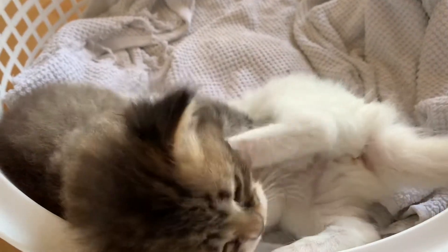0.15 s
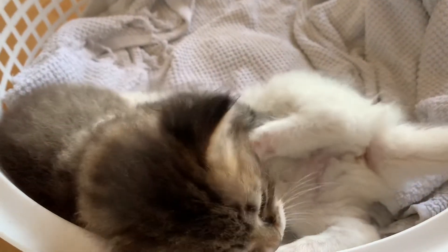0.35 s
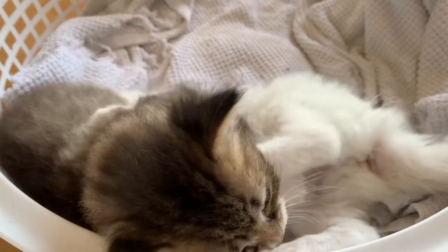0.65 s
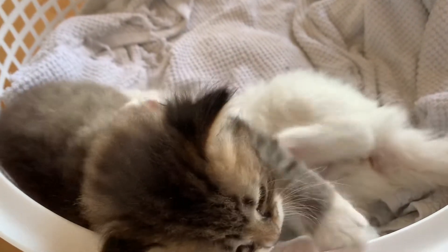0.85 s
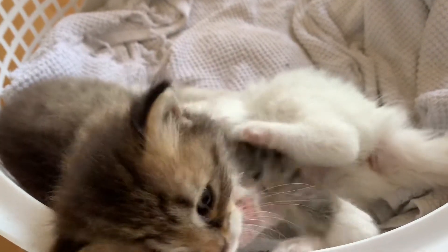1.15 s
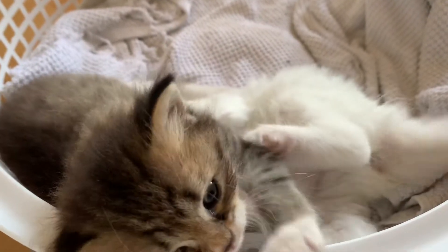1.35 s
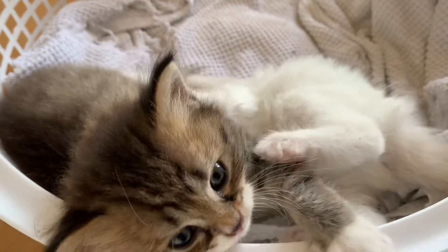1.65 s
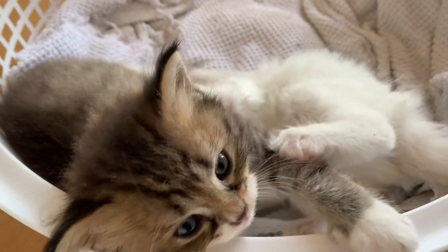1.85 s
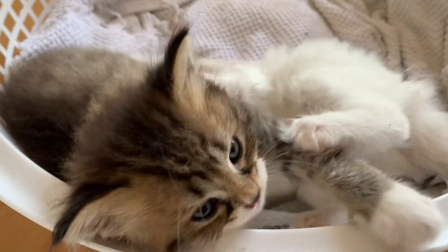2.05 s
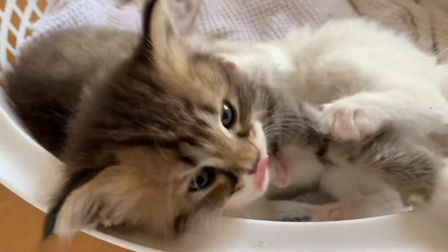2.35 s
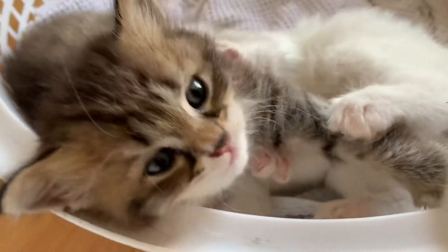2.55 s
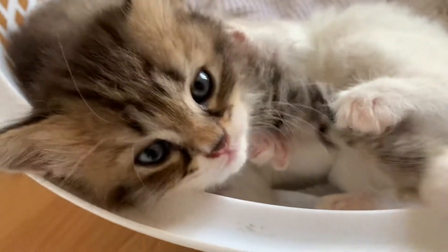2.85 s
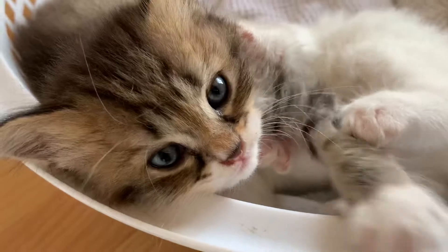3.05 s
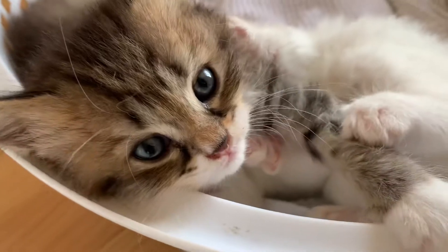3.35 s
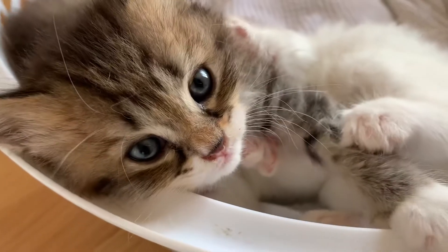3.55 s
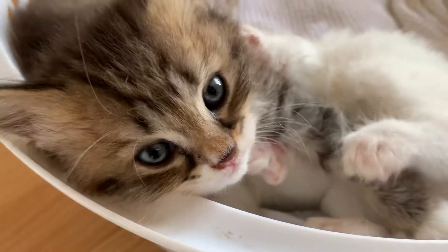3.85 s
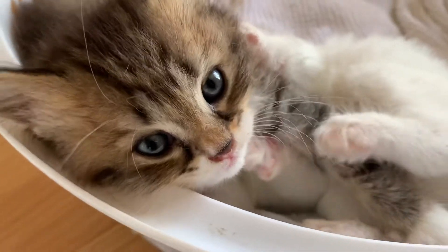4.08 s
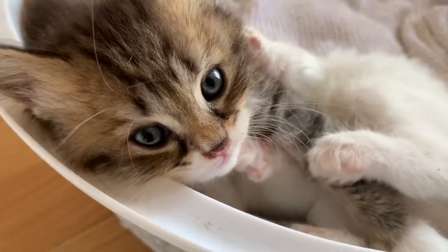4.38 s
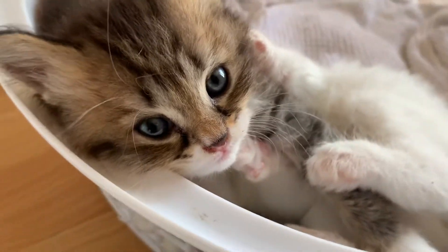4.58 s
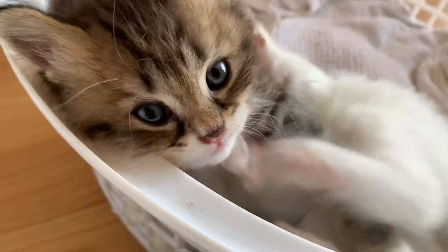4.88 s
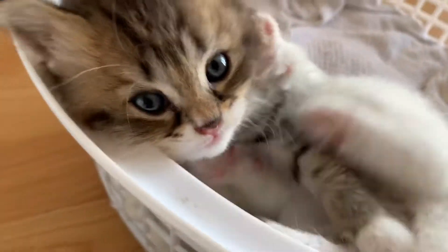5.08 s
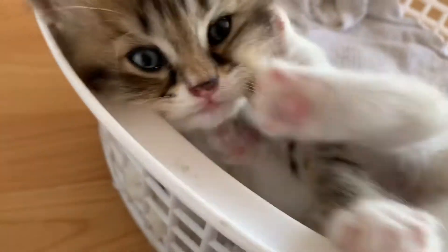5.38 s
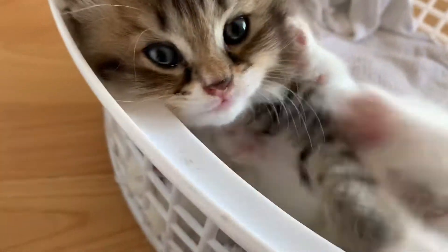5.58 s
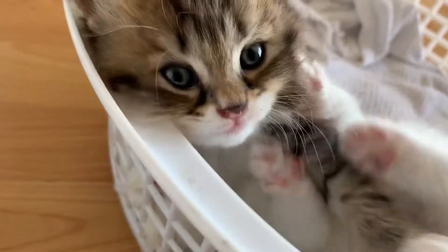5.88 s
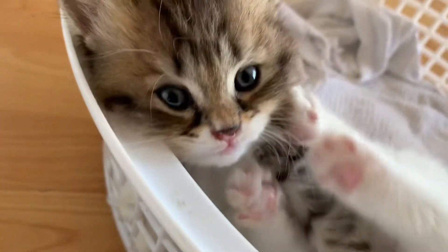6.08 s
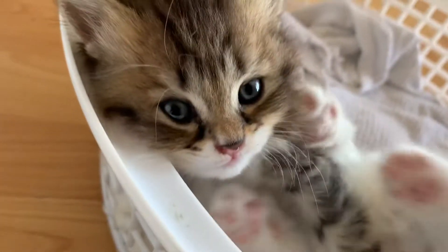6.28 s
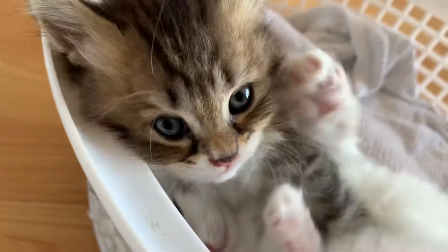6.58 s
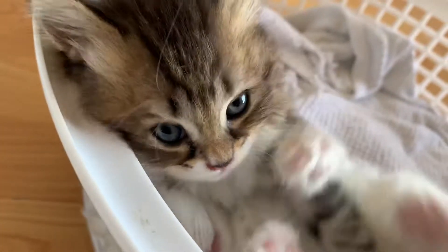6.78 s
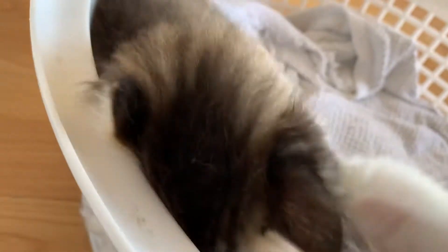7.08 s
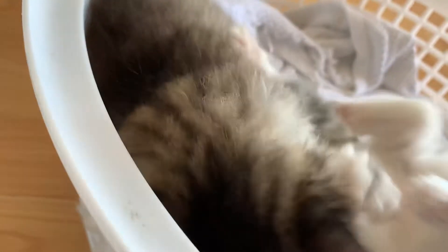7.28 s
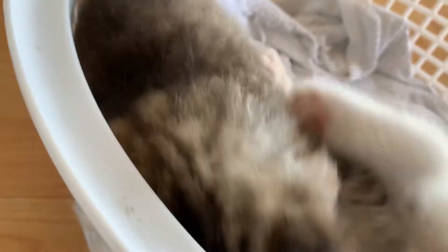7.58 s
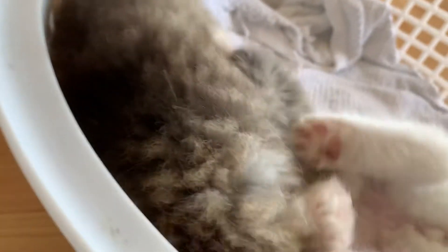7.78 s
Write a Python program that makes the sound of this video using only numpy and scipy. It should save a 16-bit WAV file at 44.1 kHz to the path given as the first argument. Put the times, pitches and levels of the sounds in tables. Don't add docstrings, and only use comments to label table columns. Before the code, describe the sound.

Close, quiet fur and cloth rustles with small claw clicks on plastic, a tiny nose wheeze, and a deep steady machine hum behind.

```python
import sys
import numpy as np
from scipy import signal
from scipy.fft import rfft, irfft, next_fast_len
from scipy.io import wavfile
from scipy.ndimage import uniform_filter1d

SR = 44100
rng = np.random.default_rng(int(sys.argv[2]) if len(sys.argv) > 2 else 0)


def linear_from_db(decibels):
    return 10 ** (np.asarray(decibels, float) / 20)


def bounce(signal):
    frames = np.transpose(np.atleast_2d(signal))
    limited = np.clip(frames, -1, 1)
    pcm = np.round(limited * 32767).astype(np.int16)
    wavfile.write(sys.argv[1], SR, pcm)


N = 349624
TIME = np.arange(N) / SR
FFT_HALF = next_fast_len(N // 2)
HZ = np.maximum(np.arange(FFT_HALF + 1) * SR / 2 / FFT_HALF, 1)


def over_hz(table):
    hz, value = np.transpose(table)
    return np.interp(np.log(HZ), np.log(hz), value)


def colour(x, gain):
    return irfft(rfft(x, 2 * FFT_HALF) * gain)[..., :N]


def resonance(hz, width_hz):
    return 1j * HZ * width_hz / (hz ** 2 - HZ ** 2 + 1j * HZ * width_hz)


def level(x, db):
    return x * linear_from_db(db) / np.sqrt(np.mean(x ** 2))


def walk(rate):
    hold = int(SR / rate)
    steps = np.repeat(rng.standard_normal(N // hold + 1), hold)
    return level(uniform_filter1d(uniform_filter1d(steps, hold), hold)[:N], 0)


def pair(alike):
    mid, side = rng.standard_normal((2, N))
    mid = colour(mid, np.sqrt(1 + alike))
    side = colour(side, np.sqrt(1 - alike))
    return np.array([mid + side, mid - side]) / np.sqrt(2)


def patches(x, depth_db):
    _, _, z = signal.stft(x, nperseg=256)
    field = uniform_filter1d(rng.standard_normal(z.shape[1:]), size=2, axis=0)
    field = uniform_filter1d(field, size=9, axis=1)
    return signal.istft(z * linear_from_db(depth_db * field / field.std()), nperseg=256)[1][:, :N]


# f/Hz, level/dB per Hz
DRAG = [(700, -33), (1150, -7), (1500, -9), (2300, -12.5), (2800, -11.5), (3400, -27)]
# f/Hz, level/dB per Hz
CLOTH = [(2200, -17), (2800, -4), (3600, -3), (4400, -6.5), (5400, -2), (6300, -7.5), (7500, -25.5)]
# f/Hz, level/dB per Hz
HAIR = [(5500, -26), (6600, -5.5), (7400, -1.5), (8500, -2.5), (10200, -5.3), (11500, -0.5), (12300, -31)]
# f/Hz, level/dB per Hz
SHEEN = [(11500, -30.5), (12300, 5), (13500, -0.4), (14500, -5), (16300, -11.5)]
# f/Hz, width/Hz, level/dB
BASKET_RIBS = [(1850, 450, -2.5), (2400, 360, -1), (3500, 1100, -8), (4230, 350, 6), (6180, 310, 3),
               (8150, 340, 7.5), (9960, 900, -4.5)]


def rubbing(per_s=2500, smooth_db=2.5, patchy_db=1, folds_db=2.9):
    ribs = 1 + sum(linear_from_db(db) * resonance(hz, width) for hz, width, db in BASKET_RIBS)
    likeness = (0.3, 0.25, 0.69, 0.97)
    out = 0
    for spectrum, gain, alike in zip((DRAG, CLOTH, HAIR, SHEEN), strokes(), likeness):
        when = rng.random(N)
        size = np.minimum(rng.exponential(size=N), 4)
        slips = (when < per_s / SR) * linear_from_db(3 * size)
        slips = np.convolve(slips, np.exp(-np.arange(120) / 25))[:N]
        noise = pair(alike)
        grain = level(slips * noise, 0) + linear_from_db(smooth_db) * noise[:, ::-1]
        layer = level(colour(grain, ribs * linear_from_db(over_hz(spectrum))), 0)
        out = out + layer * gain * linear_from_db(patchy_db * walk(30))
    return patches(out, folds_db)


# t/s, level/dB, fade/dB per s, weave drag/dB, fine hair/dB
JOLTS = [(.012, -74, 251, -7, -2.5), (.712, -63.5, 276, 1.5, -0.5), (.812, -59, 113, -5, 0),
         (1.118, -70, 350, -1.5, 2), (1.447, -66, 199, 0.5, -4.5), (1.825, -80.5, 100, 4.5, -10.5),
         (2.095, -60, 54.5, 2, -12), (2.203, -50, 55.5, -5.5, -5.5), (2.488, -59, 130, -9, -18.5),
         (2.622, -65, 100, -8, -9), (2.865, -61, 90, -4.5, -12.5), (3.096, -70, 253, 1, 4.5),
         (3.54, -63, 93.5, -4, 1), (4.815, -67.5, 100, -3.5, 2), (4.858, -58.5, 349, -4.5, -4.5),
         (4.89, -67.5, 136, 0, -5.5), (3.79, -71, 112, -2, -1), (5.205, -75.5, 92.5, 4, -2.5),
         (5.465, -67, 150, -4.5, -12), (6.284, -64, 87, 5.5, -5.5), (6.572, -82.5, 62, -12, -3)]
# peak t/s, level/dB, time to fall 10 dB/s, weave drag/dB, fine hair/dB
STROKES = [(1.37, -79.5, 0.12, 4, -6.5), (1.539, -74.5, 0.14, -0.5, -6), (1.94, -78.5, 0.13, 5.5, -10.5),
           (2.05, -72.5, 0.13, -6, -6.5), (2.25, -49, 0.0678, -9, -2.5), (3.44, -82.5, 0.17, -2.5, -6),
           (2.73, -65.5, 0.11, 0, -6), (3.19, -73, -0.12, 0, 2.5), (3.765, -57.5, 0.0217, -3, 4),
           (3.715, -59.5, 0.0144, -1.5, 3), (2.36, -60, 0.07, -6, -5), (6.4, -74, 0.12, 2.5, -4.5),
           (4.38, -83, 0.25, -13, 1), (4.75, -88, 1.2, -13, -5.5), (5.32, -84, 0.3, -1, 3),
           (5.56, -66, 0.07, -1, 1), (5.95, -85, 0.5, 4.5, 3), (6.17, -76.5, 0.17, -1.5, 1.5),
           (6.733, -73, 0.15, -2, -5), (6.92, -71.5, 0.07, -7, 3), (7.12, -83, 0.63, 4.5, 1.5)]
# level/dB, weave drag/dB, fine hair/dB
STIR = (-94, 0, 1.7)


def strokes(jolt_db_per_s=1800, sheen_db=-7, steepen=2.0):
    step = 16
    t = TIME[::step]
    shapes = [STIR]
    for s, db, fade, *mix in JOLTS:
        fall_db = np.where(t < s, jolt_db_per_s * (s - t), fade * (t - s))
        shapes.append((db - fall_db, *mix))
    for s, db, half, *mix in STROKES:
        shapes.append((db - 10 * ((t - s) / half) ** 2, *mix))
    power = 0
    for db, drag_db, hair_db in shapes:
        top_db = sheen_db + steepen * min(hair_db, 4) + 0.22 * (np.max(db) + 66.5)
        mix = linear_from_db(2 * np.array([drag_db, 0, hair_db, top_db]))
        power = power + mix[:, None] * linear_from_db(2 * db)
    return np.repeat(np.sqrt(power), step, axis=1)[:, :N]


# t/s, peak level/dB, ring f/Hz, bright crack/dB
TICKS = [(0.7266, -48, 2680, 0), (0.807, -51, 2430, -9.5), (0.8125, -41, 2350, -13.5),
         (1.1123, -57.5, 2080, -18), (1.1628, -54, 1770, -17), (2.1783, -47.5, 2500, -8.5),
         (2.1988, -30, 4420, -16.5), (2.2314, -43, 3780, -10), (2.4851, -49.5, 2450, -13),
         (2.6183, -50.5, 2400, -10), (2.8583, -47, 4460, -4), (3.0898, -46, 3860, -3),
         (3.5343, -47.5, 4170, 8.5), (4.8408, -35, 4800, 13.5), (4.8474, -35.5, 4140, -4),
         (4.8554, -49, 2623, 0), (4.8672, -33.5, 3980, -2), (4.8813, -37, 2470, -9.5),
         (5.4803, -48, 2150, -13.5), (6.681, -66, 3330, -6.5), (6.279, -46.5, 3300, -15),
         (.1765, -69, 2610, -10), (1.794, -66.5, 6400, -13), (1.887, -64.5, 7000, -6),
         (2.3654, -48, 5700, -3.5), (3.695, -54, 4000, -10), (3.708, -54.5, 3500, -5),
         (4.8415, -37.5, 6200, -8), (5.459, -58, 2580, -4), (5.4805, -52, 3600, -13),
         (5.549, -53, 4000, -6), (5.503, -58, 8500, -2), (5.5799, -53, 4000, -6), (5.606, -57.5, 3400, -8),
         (5.545, -56, 10000, -4), (6.571, -66, 5100, -12)]
# t/s, peak level/dB, ring f/Hz, bright crack/dB, thud/dB
PAWS = [(0.7054, -38, 3770, 5.5, -12), (1.1224, -59, 1640, -1.5, 2.5), (1.3223, -57.5, 2680, -14, -3),
        (1.443, -51.5, 4330, -16.5, -5), (2.0225, -61, 4700, -6, -1), (2.0676, -59.5, 2360, -2.5, 1),
        (2.4914, -49, 4320, -18.5, 5.5), (3.4978, -60.5, 2040, -12, -8), (3.718, -46, 3960, -4.5, -5),
        (4.3459, -61.5, 1600, 4.5, 2), (5.1922, -43, 2200, -17.5, 7), (5.241, -52, 2363, -4, -3.5),
        (5.5487, -50, 1650, -2, 10), (5.975, -65, 1850, 12, -3), (6.276, -41.5, 2565, -6.5, 1.5),
        (6.29, -50, 2600, -12.5, 6)]
# t/s, peak level/dB, ring f/Hz, bright crack/dB, ring/ms
KNOCKS = [
    (1.237, -61.5, 1850, -21, 11),
    (1.2965, -54.5, 1800, -6.5, 4.7),
    (1.8212, -53, 1890, -18, 5),
    (2.0925, -44.5, 1590, -17, 25),
    (2.969, -54, 2070, -7, 2.1),
    (5.198, -28, 2280, -11.5, 0.86),
]
# t/s, peak level/dB, ring f/Hz, bright crack/dB
PINGS = [
    (1.7766, -68, 4040, -7.5),
    (1.8738, -64, 4460, -12),
    (4.6757, -67, 3670, -9),
    (4.7648, -71, 2970, -8.5),
    (4.876, -47, 10360, -5),
    (6.587, -60, 5060, -6),
]
RIB_MS, THREAD_MS, LIGHT_THUD_DB = 1.6, 2.4, -21.5


def claws(late_ms=1.3, crack=0.54, thud_ms=1.6, rise_ms=0.4, ring_db=3, spread_db=-5, crack_db=3, thud_db=-3):
    size = 1600
    t = np.arange(size) / SR * 1000
    blows = [(*b, LIGHT_THUD_DB, RIB_MS) for b in TICKS]
    blows += [(*b, RIB_MS) for b in PAWS]
    blows += [(*b[:4], LIGHT_THUD_DB, b[4]) for b in KNOCKS]
    blows += [(*b, LIGHT_THUD_DB, THREAD_MS) for b in PINGS]
    ring, scrape, snap, thud = layers = np.zeros((4, 2, N))
    chance = rng.standard_normal((len(blows), 5, size))
    for (s, db, hz, bright_db, low_db, ring_ms), (both, *own) in zip(blows, chance):
        i = int((s + late_ms / 1000) * SR)
        here = np.s_[:, i:i + size]
        gain = linear_from_db(db) * (1 - np.exp(-t / rise_ms))
        noise = np.sign(both) + 0.78 * np.array(own[:2])
        side = np.array(own[2:])[:, :1]
        contact_ms = min(ring_ms, 1.8)
        sharp_db = 0.47 * max(bright_db + 6, 0)
        tone = np.sin(2 * np.pi * hz * t / 1000 + 0.33 * side) * np.exp(-t / ring_ms)
        ring[here] += gain * linear_from_db(ring_db - sharp_db) * tone
        scrape_db = spread_db + 0.2 * sharp_db + min(bright_db + 12.5, 0)
        scrape[here] += gain * linear_from_db(scrape_db) * noise * np.exp(-t / contact_ms)
        snap[here] += gain * linear_from_db(bright_db + crack_db) * noise * np.exp(-t / (crack * contact_ms))
        thud[here] += gain * linear_from_db(low_db + thud_db) * noise * np.exp(-t / thud_ms)
    bands = 1, 2 * resonance(2000, 4500), resonance(8000, 8000) ** 2, 3 * resonance(810, 1100) ** 2
    return sum(colour(x, band) for x, band in zip(layers, bands))


# t/s, length/s, rms level/dB, start f/Hz, end f/Hz
RUBS = [(.812, .05, -67, 2360, 2280), (1.826, .06, -67, 1950, 1980), (1.9, .07, -69.5, 2000, 2600),
        (2.095, .1, -61, 1550, 1394), (2.1, .08, -63, 4500, 4560), (2.2, .09, -52, 4500, 4200),
        (2.21, .09, -57, 2610, 3100), (2.49, .07, -66, 4280, 4380), (2.62, .05, -66, 6500, 6300),
        (3.69, .03, -67.5, 2595, 2500), (4.845, .05, -56, 5720, 5600), (4.885, 0.028, -63, 2400, 2300),
        (5.47, .06, -66, 3900, 4000), (6.288, .06, -62, 2100, 2500), (6.29, .045, -61, 1100, 1320),
        (6.57, 0.088, -77.5, 5300, 5500), (3.86, 0.036, -77, 3900, 4000), (2.865, .09, -68, 4400, 4300)]
RUB_WIDTH, RUB_RISE_S = 0.17, 0.005


def rubs(alike=0.7, grain_db=3):
    out = np.zeros((2, N))
    size = 8000
    t = np.arange(size) / SR
    for (s, length, db, from_hz, to_hz), chance in zip(RUBS, rng.standard_normal((len(RUBS), 7, size))):
        part = np.clip(t / length, 0, 1)
        smear = np.hanning(int(SR / (RUB_WIDTH * from_hz)) + 2)
        smear = smear / np.sqrt(np.sum(smear ** 2))
        slow = signal.fftconvolve(chance, smear[None], mode="same", axes=1)
        a = np.sqrt(alike) * slow[0] + np.sqrt(1 - alike) * slow[1:3]
        b = np.sqrt(alike) * slow[3] + np.sqrt(1 - alike) * slow[4:6]
        phase = 2 * np.pi * np.cumsum(from_hz + (to_hz - from_hz) * part) / SR
        shape = np.minimum(t / RUB_RISE_S, 1) * np.sqrt(1 - part ** 2)
        shape = shape * linear_from_db(db + grain_db * uniform_filter1d(slow[6], size=150))
        i = int(s * SR)
        out[:, i:i + size] += shape * (a * np.cos(phase) + b * np.sin(phase))
    return out


# t/s, peak level/dB, f/Hz, decay/ms
BUMPS = [
    (4.846, -29.5, 78.7, 22),
    (4.881, -45, 473, 7),
    (5.199, -44, 501, 5.2),
    (5.199, -45.5, 1340, 2.1),
    (6.3, -60.5, 1110, 12),
]


def bumps():
    out = np.zeros(N)
    for s, db, hz, decay_ms in BUMPS:
        t = np.maximum(TIME - s, 0)
        out += linear_from_db(db) * np.sin(2 * np.pi * hz * t) * np.exp(-t * 1000 / decay_ms)
    return out


# t/s, level/dB
WHEEZE = [
    [(1.23, -88), (1.3, -71), (1.414, -70.5), (1.482, -60.5), (1.564, -62.5), (1.65, -82)],
    [(3.33, -92), (3.38, -75), (3.46, -78), (3.5, -80.5)],
    [(4.28, -81), (4.294, -83), (4.5, -87)],
]
# f/Hz, width/Hz, level/dB
NOSE = [(2620, 220, -13), (3240, 320, -3.5), (3797, 150, 1), (4270, 110, -12)]
# t/s, f/Hz, level/dB, octave level/dB
SQUEAK = [(.44, 2800, -100, -110), (.452, 3680, -82, -105), (.465, 4300, -79.5, -99), (.48, 4100, -72, -95),
          (0.498, 4180, -76, -89), (0.521, 3820, -73, -75), (.545, 3500, -80, -100),
          (.565, 3210, -88, -110), (.605, 2670, -99, -110)]


def nose(share_db=-2):
    passages = sum(linear_from_db(db) * resonance(hz, width) ** 2 for hz, width, db in NOSE)
    flow = sum(linear_from_db(np.interp(TIME, *np.transpose(b), left=-200, right=-200)) for b in WHEEZE)
    breath = flow * level(colour(pair(0.94), passages), share_db)
    s, hz, db, octave_db = np.transpose(SQUEAK)
    phase = 2 * np.pi * np.cumsum(np.interp(TIME, s, hz)) / SR
    on = (TIME > s[0]) & (TIME < s[-1])
    whistle = linear_from_db(np.interp(TIME, s, db)) * np.sin(phase)
    whistle += linear_from_db(np.interp(TIME, s, octave_db)) * np.sin(2 * phase)
    return breath, np.sqrt(2) * on * whistle


# rotor multiple, pull multiple, rms level/dB, left minus right/dB
HUM = [(1, 0, -43, -1.5), (2, 0, -48, -2.5), (3, 0, -59.5, -2.5), (4, 0, -55, -0.5), (5, 0, -67.5, -4.5),
       (8, 0, -74, 4.5), (0, 1, -59, -7.5), (0, 2, -57.5, -1.1), (0, 3, -62.5, 1), (1, 2, -62.5, -0.5),
       (3, 1, -65.5, -1.5), (2, 1, -70.5, -2.5), (2, 2, -69, 2), (-1, 3, -70, -2.5), (2, 3, -79, 2.1),
       (4, 2, -79, -0.1)]
# multiple, rms level/dB, left minus right/dB
FAN_HUM = [(4, -56, 0.7), (6, -65.5, -5), (7, -74, -5)]
PUMP_HUM = [(1, -60.5, -5.5), (2, -53.5, -3.5), (3, -68, 3)]
PIPE_HUM = [(1, -52, -2.5)]
FAN_SECOND_HUM = [(1, -56.5, -5.5)]
BELT_HUM = [(1, -64, -1.5)]
# rate f/Hz, a moment when the partials crest together t/s
ROTOR, MAINS = (48.383, 3.5604), (99.941, 3.5556)
FAN, PUMP, PIPE = (47.878, 3.5592), (96.281, 3.5530), (85.808, 3.5612)
FAN_SECOND, BELT = (95.77, 3.5634), (146.67, 3.5581)
WAVER_DB, WAVER_RAD = 0.5, 0.04
MIXED_LEAD = 0.38


def turns(part):
    rate_hz, crest_s = part
    return rate_hz * (TIME - crest_s)


def compressor():
    lines = []
    for r, m, db, lean_db in HUM:
        lead = MIXED_LEAD * (r * m != 0)
        lines.append((r * ROTOR[0] + m * MAINS[0], r * turns(ROTOR) + m * turns(MAINS) + lead, db, lean_db))
    neighbours = ((FAN, FAN_HUM), (PUMP, PUMP_HUM), (PIPE, PIPE_HUM), (FAN_SECOND, FAN_SECOND_HUM), (BELT, BELT_HUM))
    for part, table in neighbours:
        lines += [(k * part[0], k * turns(part), db, lean_db) for k, db, lean_db in table]
    shake, slip, out = walk(7), walk(3), 0
    for k, (hz, cycles, db, lean_db) in enumerate(lines):
        own = k * N // len(lines)
        tone = np.cos(2 * np.pi * cycles + WAVER_RAD * hz / 50 * np.roll(slip, own))
        tone = tone * linear_from_db(db + WAVER_DB * hz / 50 * np.roll(shake, own))
        out = out + np.sqrt(2) * tone * linear_from_db(np.array([[lean_db], [-lean_db]]) / 2)
    return out


# f/Hz, level/dB per Hz
ROOM = [(34, -45.5), (44, -5.5), (101, -7.5), (140, -13), (199, -10.5), (290, -14.5), (444, -27),
        (680, -28.5), (1100, -37), (1600, -48), (2600, -56), (6000, -62.5), (10200, -62.5), (15000, -68.5)]
# f/Hz, width/Hz, rms level/dB
ROOM_MODES = [(72.4, 8.1, -57.5), (88, 6, -60), (94.14, 3.3, -55), (104.4, 11, -60.5), (141.7, 7, -60.5),
              (186, 7.5, -58), (211.8, 6.4, -64), (249.9, 9, -59), (268.8, 3.3, -63), (297.5, 14, -60.5),
              (348.5, 20, -70), (399.7, 8.9, -71.5)]
# f/Hz, likeness -1..1
ALIKE = [(60, 0.85), (200, .93), (350, 0.36), (600, -0.031), (1400, -.15), (4000, .03)]
# f/Hz, left minus right/dB
ROOM_LEAN = [(60, -7), (250, -1.5), (500, 1.5), (3000, 1.5), (9000, -1.5)]
ROOM_DB = -50.5


def room():
    alike = over_hz(ALIKE)
    lean = linear_from_db(over_hz(ROOM_LEAN) * np.array([[0.5], [-0.5]]))
    air = level(colour(pair(alike), linear_from_db(over_hz(ROOM)) * lean), ROOM_DB)
    air = air * linear_from_db(0.56 * walk(3.6))
    tuned = 0
    for hz, width, db in ROOM_MODES:
        tuned = tuned + linear_from_db(db) * abs(resonance(hz, width)) ** 2 / np.sqrt(np.pi / 2 * width / SR)
    return patches(air, 2.0) + colour(pair(alike), tuned * lean)


# f/Hz, right port late/ms
PORT_LAG = [(500, 0.097), (3000, 0.45), (6500, -0.3134), (16000, -.295)]


def ports(x):
    late_s = over_hz(PORT_LAG) / 1000
    return np.array([x[0], colour(x[1], np.exp(-2j * np.pi * HZ * late_s))])


# from f/Hz, to f/Hz, share of blocks kept anyway 0-1
HOLES = [(11150, 11450, .5), (11450, 11750, .12), (11750, 12100, .02), (12100, 12450, .15),
         (14250, 14600, .7), (14600, 15300, .01), (15300, 16000, .01), (16000, 17000, .001)]


def thin_out(x, attack_db=9, loud_db=-86, lag=2600):
    power = np.mean(colour(x, HZ > 2000) ** 2, axis=0) + 1e-18
    rise = uniform_filter1d(power, size=128) / uniform_filter1d(power, size=2048, origin=900)
    attack = uniform_filter1d(1.0 * (rise > linear_from_db(2 * attack_db)), size=400) > 1e-6
    for lo, hi, kept in HOLES:
        band = colour(x, (HZ > lo) & (HZ < hi))
        near = uniform_filter1d(band[0] ** 2, size=2048)
        swelling = near > 1.6 * np.roll(near, lag)
        loud = (lo == HOLES[-2][0]) & (near > linear_from_db(2 * loud_db)) & swelling
        lucky = np.repeat(rng.random(N // 1024 + 1) < kept, 1024)[:N]
        x = x - band * (1 - uniform_filter1d(1.0 * (attack | loud | lucky), size=400))
    return x


def scene():
    breath, whistle = nose()
    ticks = claws()
    t = np.arange(4000) / SR
    basket = rng.standard_normal((2, 4000)) * linear_from_db(-60 * t / 0.018 - 40.5)
    echo = signal.fftconvolve(ticks, basket, axes=1)[:, :N]
    near = ports(rubbing() + rubs() + ticks + breath)
    return near + echo + bumps() + whistle + compressor() + room()


def band_limit(x):
    return signal.sosfilt(signal.butter(12, 16500, fs=SR, output="sos"), x)


# f/Hz, level/dB
TOP_COLOUR = [(40, -0.5), (11000, 0.5), (11950, -8.5), (13000, 0), (14300, -3.5), (14900, -9.5), (15600, -3),
              (16000, -4), (16600, -30)]
END_S, FADE_S = 7.182, 0.034


def record(dry):
    hiss = level(colour(pair(0.1), resonance(13000, 6000) ** 2), -84.5)
    heard = thin_out(colour(dry + hiss, linear_from_db(over_hz(TOP_COLOUR))))
    fade_out = np.sin(np.pi / 2 * np.clip((END_S - TIME) / FADE_S, 0, 1)) ** 2
    fade_in = np.clip(TIME * SR / 8, 0, 1)
    return band_limit(heard * fade_out * fade_in)


dry = scene()
out = record(dry)
bounce(out)
```